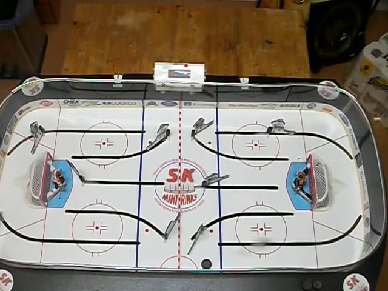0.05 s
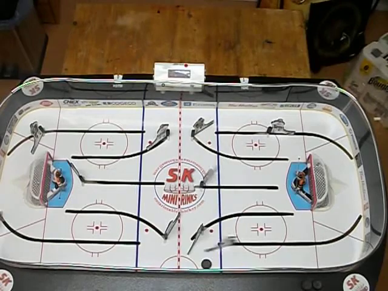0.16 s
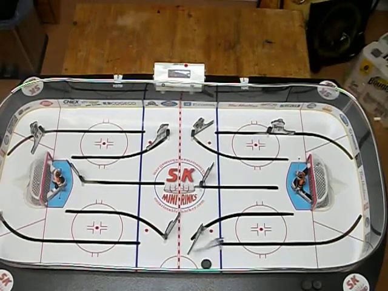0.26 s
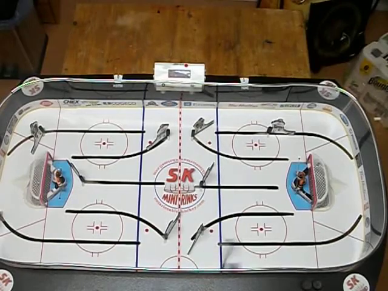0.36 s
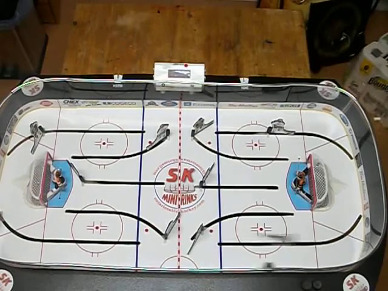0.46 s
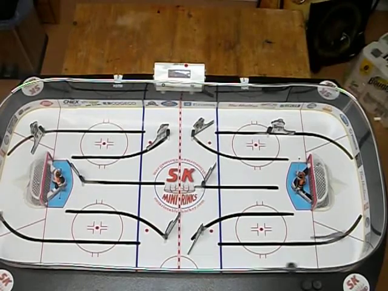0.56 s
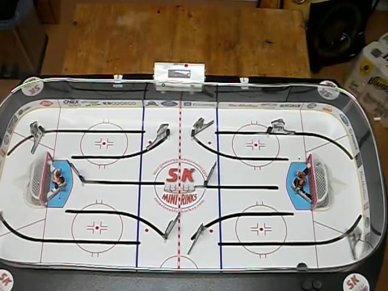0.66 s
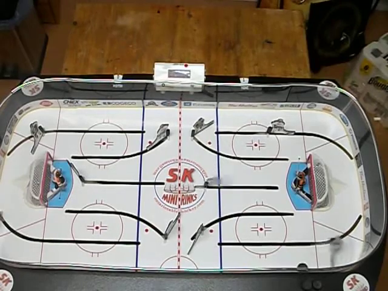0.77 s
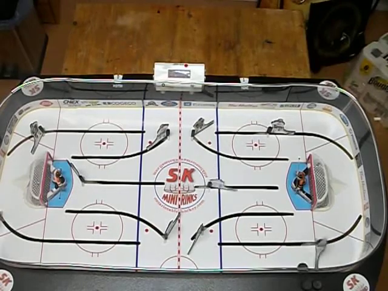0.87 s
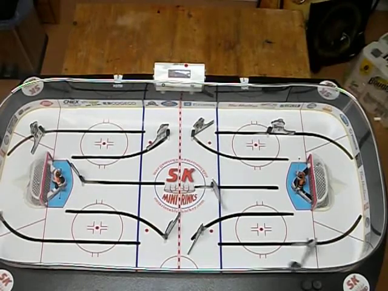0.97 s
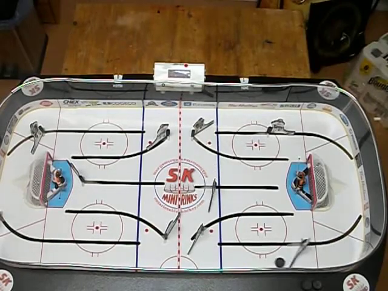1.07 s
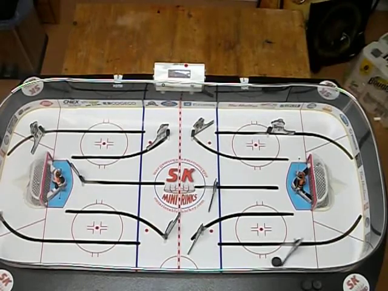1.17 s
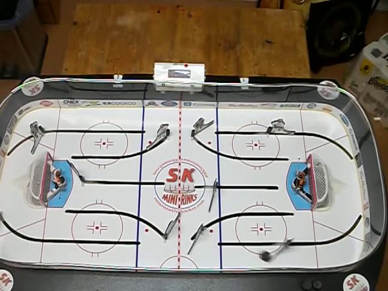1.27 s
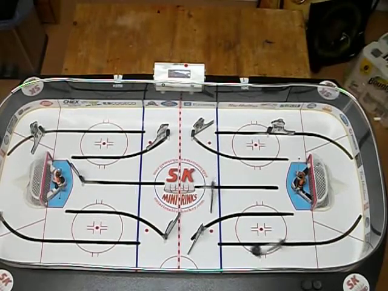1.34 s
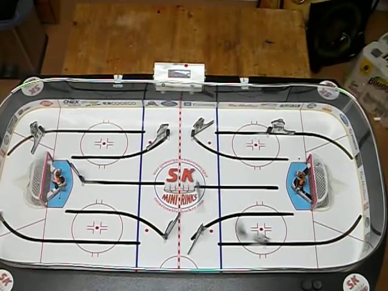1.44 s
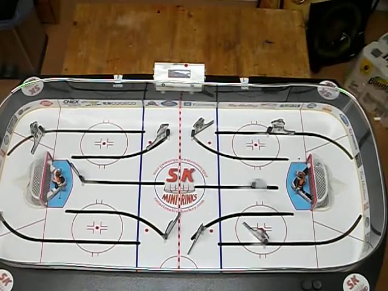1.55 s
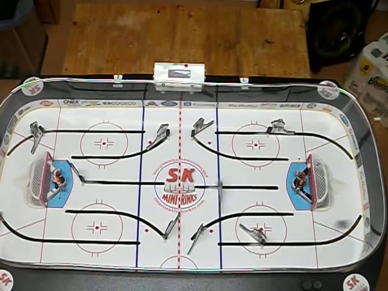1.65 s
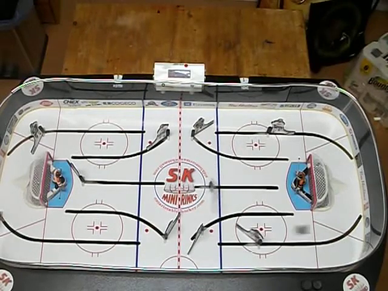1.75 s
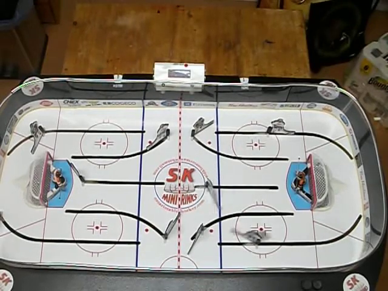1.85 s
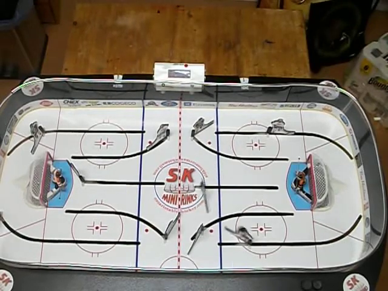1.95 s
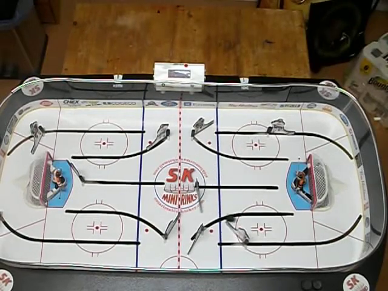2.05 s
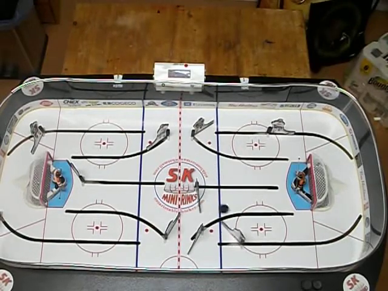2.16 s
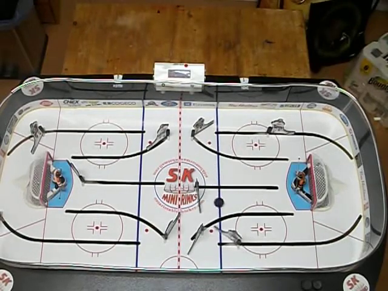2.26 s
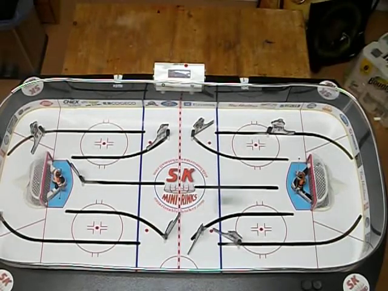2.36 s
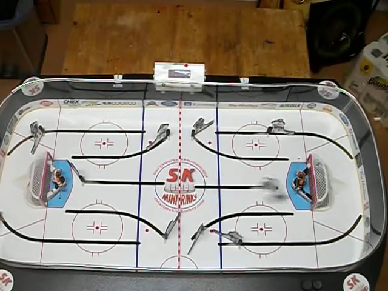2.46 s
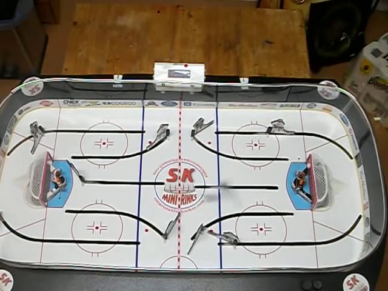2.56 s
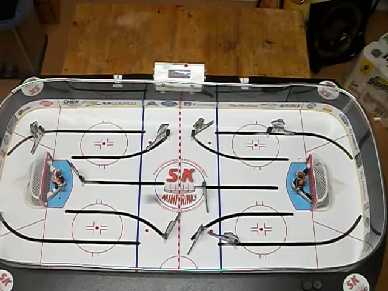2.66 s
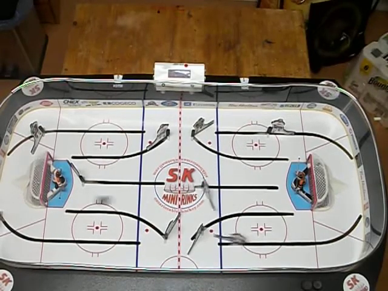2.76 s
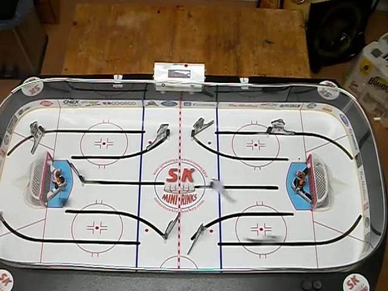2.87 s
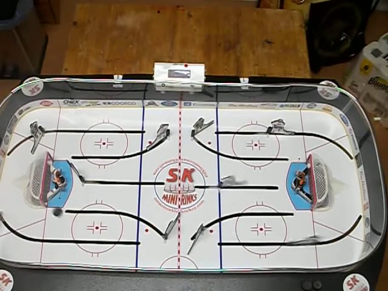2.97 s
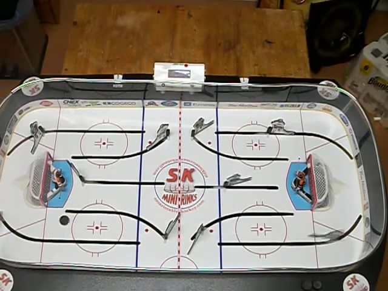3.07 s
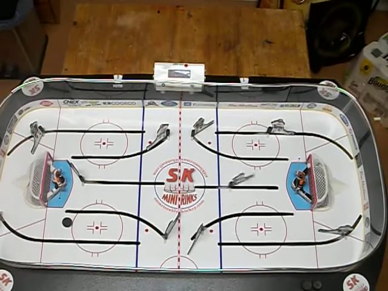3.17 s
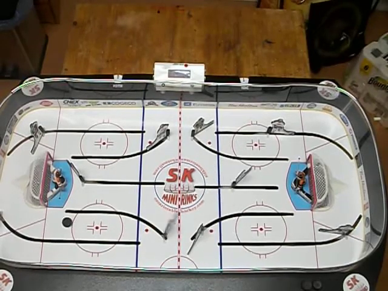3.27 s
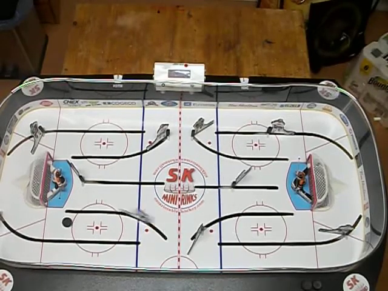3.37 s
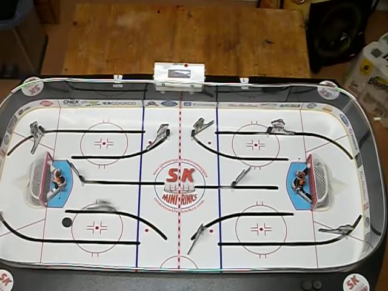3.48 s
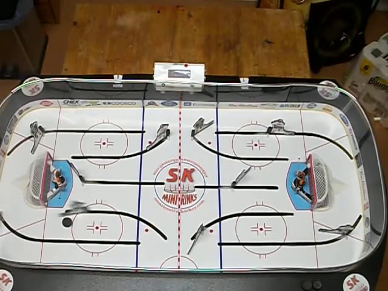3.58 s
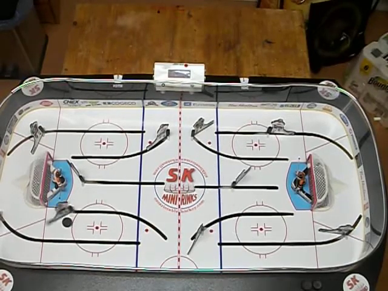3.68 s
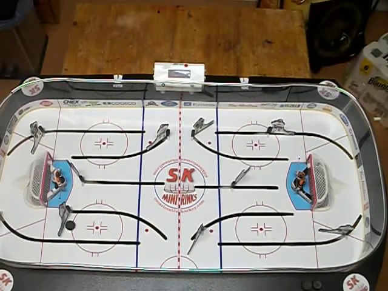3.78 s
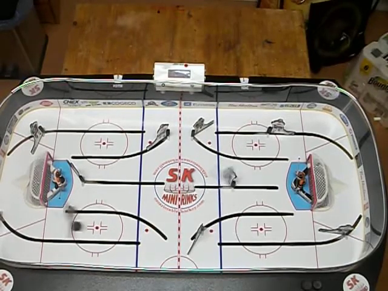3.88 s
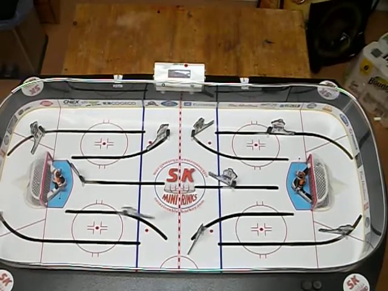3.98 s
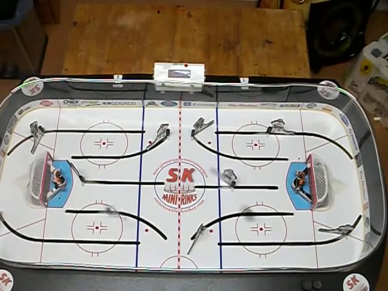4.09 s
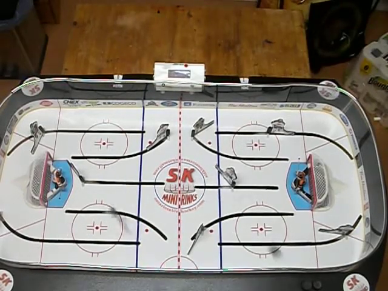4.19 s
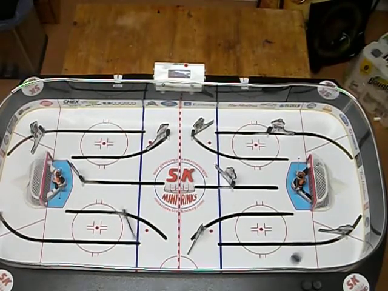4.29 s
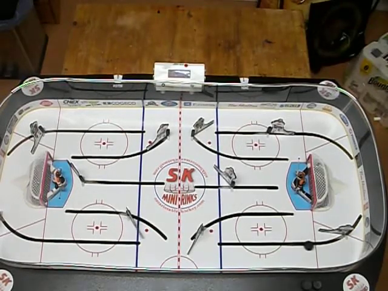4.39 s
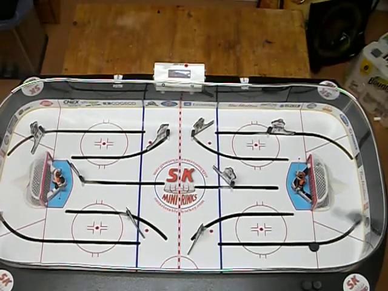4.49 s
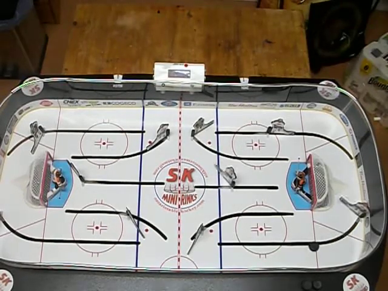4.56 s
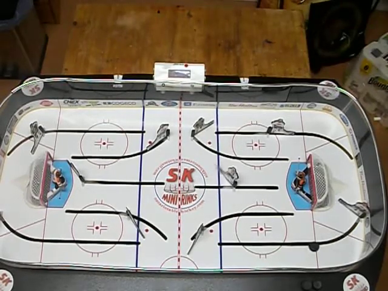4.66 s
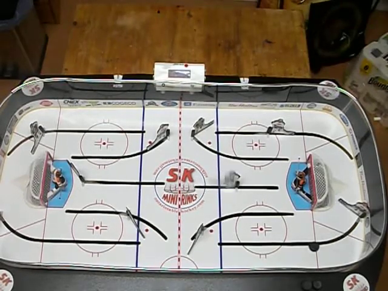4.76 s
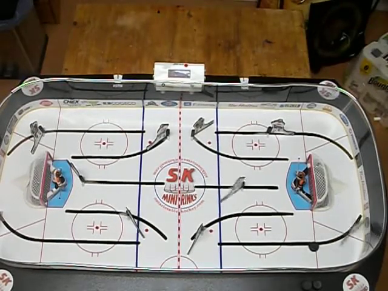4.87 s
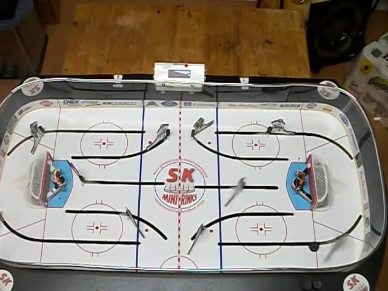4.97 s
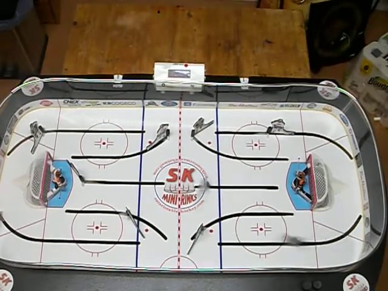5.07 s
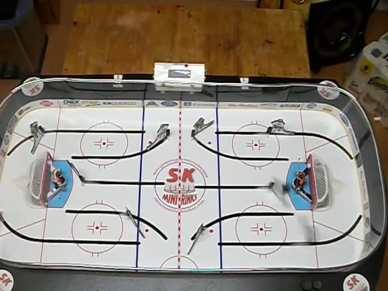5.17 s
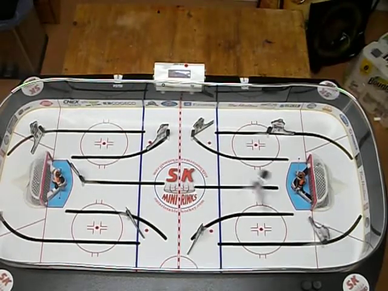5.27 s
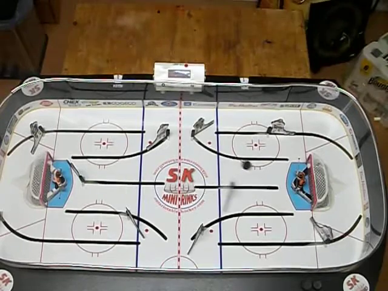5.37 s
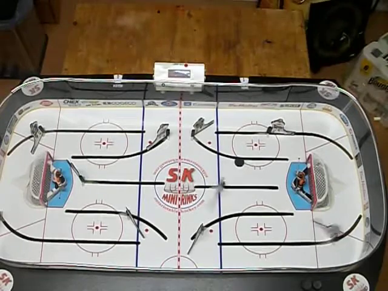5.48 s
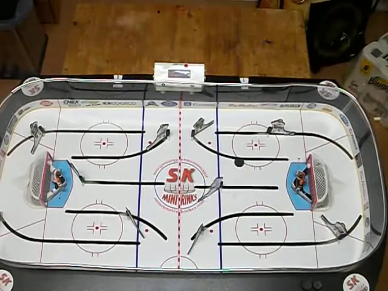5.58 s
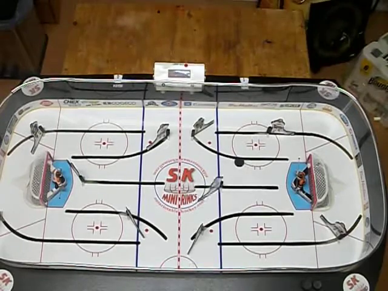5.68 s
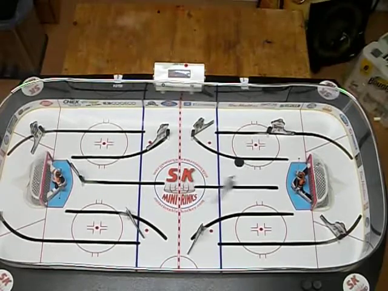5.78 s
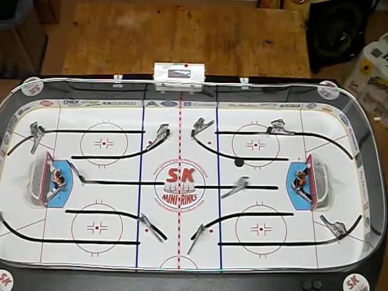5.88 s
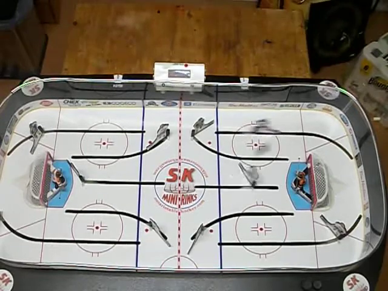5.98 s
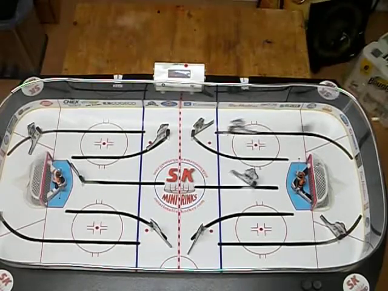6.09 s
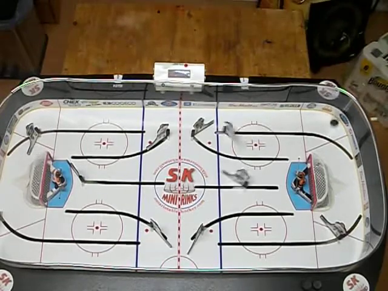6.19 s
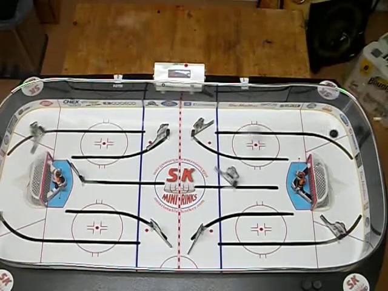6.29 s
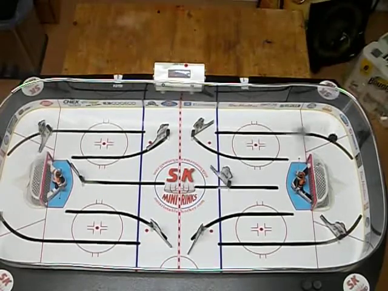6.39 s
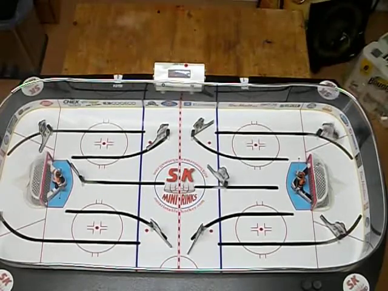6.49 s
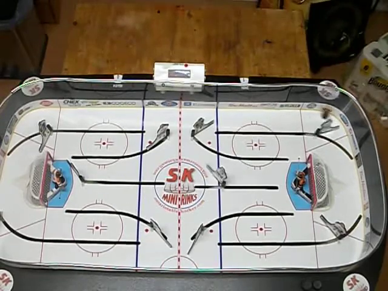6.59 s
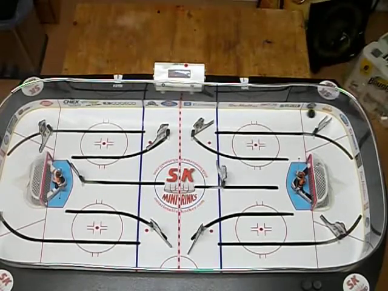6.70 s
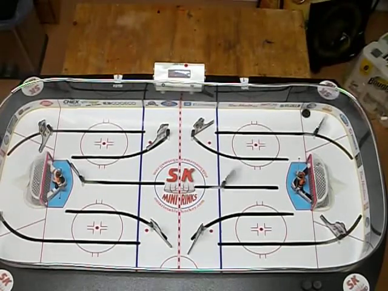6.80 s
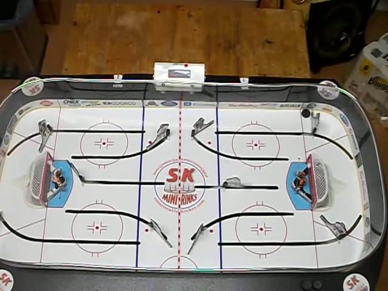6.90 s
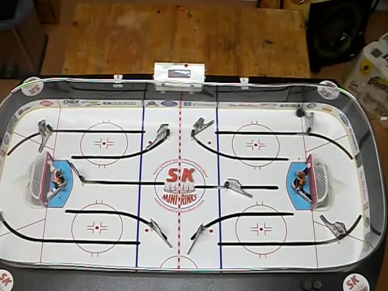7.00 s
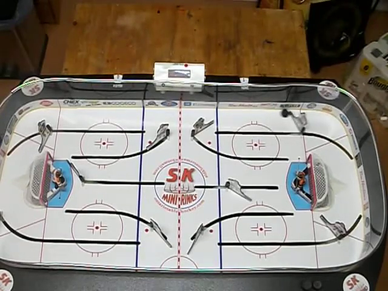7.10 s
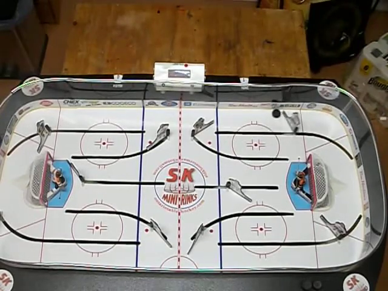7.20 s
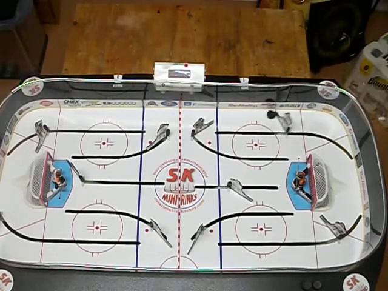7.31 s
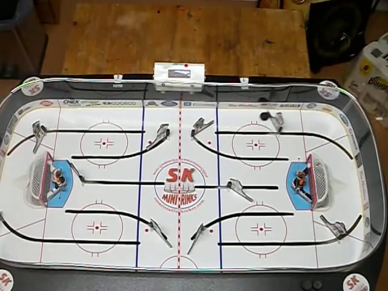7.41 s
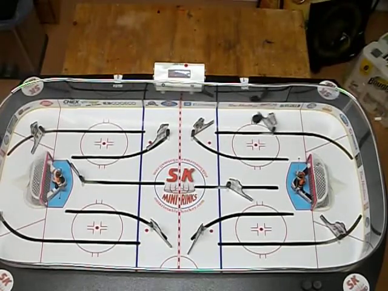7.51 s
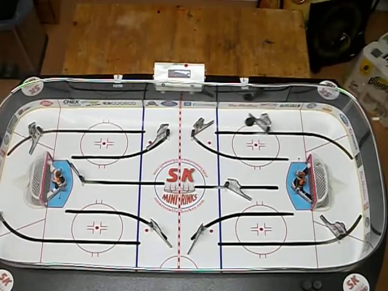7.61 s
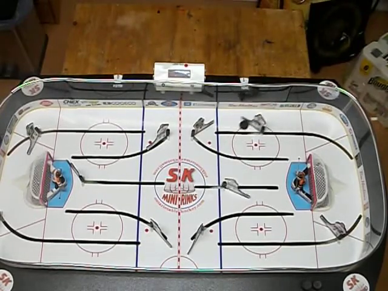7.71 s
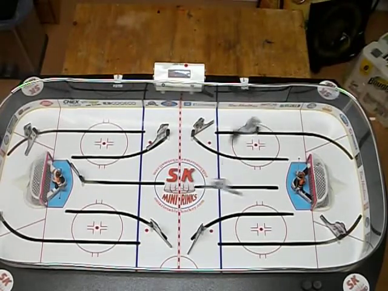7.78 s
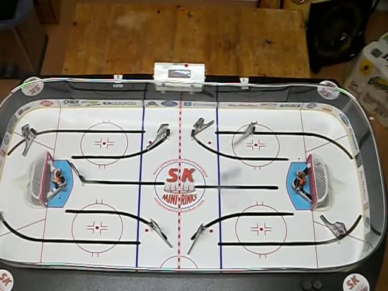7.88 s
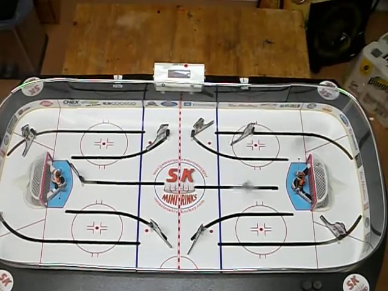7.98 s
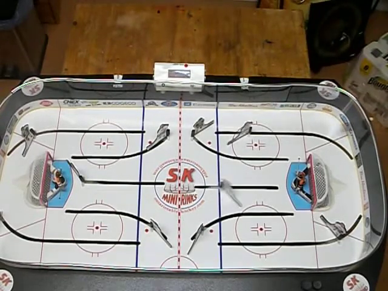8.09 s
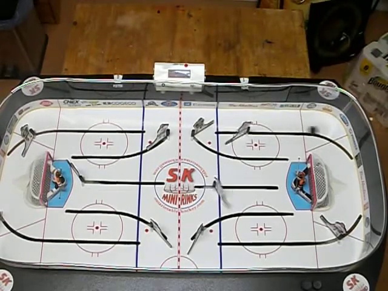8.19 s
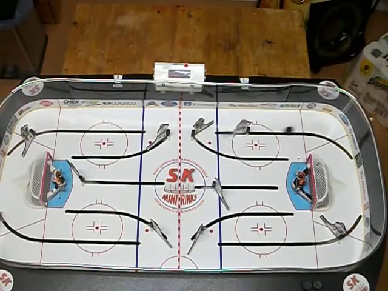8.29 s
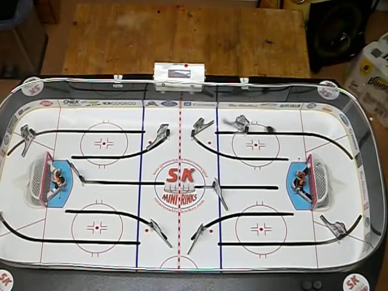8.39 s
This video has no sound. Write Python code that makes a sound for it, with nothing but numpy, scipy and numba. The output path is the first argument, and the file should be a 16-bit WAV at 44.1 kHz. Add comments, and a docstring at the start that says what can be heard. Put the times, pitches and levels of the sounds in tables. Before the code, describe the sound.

Rods scrape and chatter while a puck clacks sharply around a hollow plastic rink, in uneven flurries with short pauses, through a small camera microphone.

```python
"""A rod scrapes over faint hum and air, then clacks break in: rod hockey on a hollow plastic rink in a quiet room.
Puck, sticks and rod stops strike damped modes and bounce; sliding rods chatter noise through the same modes.
Drags sing in one band, as noise through two short rings in a row at one pitch; decaying noise gives the echoes.
A small camera cuts the top, turns itself down after loud play and clips the hardest blows."""
import sys
import numpy as np
from scipy import signal
from scipy.fft import rfft, irfft
from scipy.io import wavfile
from scipy.ndimage import uniform_filter1d
from numba import njit

SR = 44100
rng = np.random.default_rng(int(sys.argv[2]) if len(sys.argv) > 2 else 0)


def store_pcm(level_fs):
    """Save levels as 16-bit WAV."""
    pcm = np.round(np.clip(level_fs, -1, 1) * 32767).astype(np.int16)
    wavfile.write(sys.argv[1], SR, np.atleast_2d(pcm).T)


def rack_gain(trim_db):
    """Turn a fader trim in dB into the linear factor to multiply a signal by."""
    fader = np.asarray(trim_db, float)
    return 10 ** (fader / 20)


N = 372644

# modes of rink, players and puck: f/Hz, level/dB
RINK_MODES = [(330, -0.5), (470, 3.5), (630, 0), (750, -9.5), (950, -2), (1250, -0.5), (1500, 3.5),
              (2000, 3), (2400, 7), (2800, 5.5), (3200, 5.5), (3600, 6), (3920, 9), (4250, 7.5),
              (4550, 7.5), (4900, 8), (5300, -3), (5800, -9), (6400, 1)]
# rod pushes and pulls: t/s, length/s, treble chatter/dB, hollow rumble/dB
STROKES = [(0, 0.014, -36.5, -27), (0.097, 0.038, -43, -33), (0.509, 0.011, -32.5, -24),
           (0.61, 0.041, -28.5, -23), (0.737, 0.25, -49, -36), (1.388, 0.12, -48.5, -46),
           (1.529, 0.23, -33, -33.5), (1.892, 0.27, -46, -39), (2.434, 0.17, -37.5, -36.5),
           (2.974, 0.21, -48, -33), (3.411, 0.16, -45.5, -36.5), (3.506, 0.06, -36, -32.5),
           (3.85, 0.18, -64.5, -47), (4.009, 0.041, -30.5, -25), (4.264, 0.11, -25, -28.5),
           (4.46, 0.19, -35, -29), (4.998, 0.17, -46, -31), (5.119, 0.1, -28, -29),
           (5.253, 0.065, -24, -40.5), (5.325, 0.052, -33, -29), (5.585, 0.085, -48, -34),
           (5.858, 0.57, -46.5, -41.5), (6.268, 0.21, -39, -28.5), (6.557, 0.14, -44.5, -36.5),
           (7.857, 0.04, -53.5, -68), (7.88, 0.069, -37, -35), (7.968, 0.28, -28.5, -29),
           (8.238, 0.13, -27.5, -20)]
# room air spectrum, relative: f/Hz, level/dB
AIR_SPECTRUM = [(8.8, -45), (15, -4), (49, -16), (187, -14.5), (340, -14.5), (795, -22.5), (971, -20.5),
                (1770, -33.5), (3930, -25.5), (4920, -25), (5860, -27.5), (7620, -52), (12900, -120)]
# machine hum: f/Hz, rms level/dB
HUM_TONES = [(55.7, -51.5), (118, -55.5), (151, -56.5)]
# echo bands: f/Hz, t60/s, level/dB
ROOM_BANDS = [(300, 0.66, -15.5), (1296, 0.43, -7), (3800, 0.37, -2.5)]
# blows: t/s, peak level/dB, brightest ring f/Hz, hollow knock re bright rings/dB, level to walls/dB
CLACKS = [(0.0945, -10, 3390, -17.5, -0.5), (0.3372, -13, 3160, -4.5, 7), (0.381, 1, 4800, -53, -3.5),
          (0.407, 0, 3910, -50, -3), (0.5046, -1.5, 4400, -29.5, 2.5), (0.5232, -4, 4350, -42, -13),
          (0.53, 1, 3550, -23.5, -24), (0.5986, -3, 4380, -14, 9.5), (0.603, -11, 4620, -27, -6),
          (0.6242, -5, 4400, -39, -12), (0.63, -3, 4530, -29, -16), (0.643, -9.5, 4300, -22, -11),
          (0.6585, -1.5, 4170, -21, -15), (0.7607, -9, 3920, -25, 3), (0.818, -11.5, 3530, -7.5, 9),
          (1.011, -6.5, 4700, -15.5, -2), (1.0315, -14.5, 4630, -35, -0.5),
          (1.262, -19.5, 4600, -30.5, 2.5), (1.519, -9.5, 3980, -14, 5.5), (1.5536, -2, 3650, -29.5, -11.5),
          (1.5698, 12, 4150, -46.5, -7), (1.5788, 1.5, 3870, -49, -14), (1.5845, 5.5, 4350, -55.5, -18),
          (1.596, 10.5, 4770, -45.5, -2), (1.642, 4.5, 4070, -47, -18), (1.664, -13.5, 4400, -20, -9),
          (1.697, 18.5, 4480, -44, -6.5), (1.8916, 11, 5050, -32, -4), (1.904, 2.5, 4200, -56, -21),
          (1.964, -3.5, 3600, -17.5, -2), (2.006, 8.5, 4030, -30, 0.5), (2.051, -7, 4250, -22.5, -15.5),
          (2.0755, -6, 3100, -20.5, 0.5), (2.1806, -9.5, 4280, -32, -24), (2.2123, 6.5, 4120, -54.5, 0.5),
          (2.239, -4, 3440, -47, -6.5), (2.314, -9, 4150, -30, -2), (2.3933, -5.5, 4250, -37.5, 2),
          (2.4274, -4.5, 3430, -43.5, 0), (2.4332, 3, 5400, -28.5, 4.5), (2.4512, 1.5, 4130, -36.5, 1.5),
          (2.474, 4, 3930, -49, -21), (2.488, 6, 3960, -28, -11.5), (2.5085, 6.5, 4050, -46.5, 8.5),
          (2.5563, -0.5, 3400, -25.5, -11), (2.579, 13, 4230, -51, -13.5), (2.626, 6, 4520, -48, -12),
          (2.628, -1, 4200, -33, 3.5), (3.0048, -1, 3090, -45, -0.5), (3.1166, -10, 4230, -34, 1),
          (3.154, -17, 4230, -37, -2), (3.2195, -18, 3900, -25, 1), (3.4493, -19, 3140, -13, -15),
          (3.5057, -8.5, 3610, -24, 0), (3.5438, -10, 3600, -16, 10.5), (3.553, -21.5, 3750, -3, -1.5),
          (3.6387, -14, 3170, -6.5, 12), (3.8166, -8.5, 3900, -26.5, 2), (3.9077, -11, 3400, -28.5, 4.5),
          (3.952, -8, 3900, -24, 8.5), (4.003, -8.5, 4110, -46, 14), (4.022, -4, 3340, -15, -4),
          (4.029, -0.5, 3820, -30, -18.5), (4.041, 0, 3730, -28.5, -4.5), (4.122, 19.5, 3770, -68, -8.5),
          (4.2514, 21.5, 3750, -40, -18), (4.2642, 3, 3310, -46, -22), (4.306, 11.5, 3840, -43.5, -8),
          (4.324, 5, 4100, -46, -17), (4.3393, 6.5, 4130, -32, -12.5), (4.463, 8, 3660, -21, -5.5),
          (4.477, -3.5, 3050, -27, -21), (4.528, 0, 4470, -14.5, 10), (4.6468, -3.5, 1890, -26, -9.5),
          (4.656, -1.5, 1990, -17, 3), (5.0017, -12, 3360, -13.5, 3), (5.094, -14, 3230, -29.5, -2.5),
          (5.1131, 2.5, 3700, -22, -4.5), (5.1212, -4.5, 3910, -34, -4.5), (5.157, 4.5, 4260, -33, -1.5),
          (5.2225, 0.5, 3540, -38, 3.5), (5.235, 3, 3830, -16, -1), (5.2392, 13, 5030, -42, -2),
          (5.2573, 8.5, 4020, -25.5, -4), (5.263, 0, 4770, -41, -15), (5.306, 2, 4300, -34, -5),
          (5.316, -5.5, 3500, -43, -4.5), (5.332, 1, 3800, -43, 0.5), (5.3428, -11, 4240, -27, -25),
          (5.362, 1.5, 4200, -29.5, 1.5), (5.4634, -5.5, 4940, -38, -28), (5.6683, -20.5, 3300, -23, 9),
          (5.8234, -18.5, 3450, -12.5, 13), (5.847, -10.5, 3060, -19.5, 4.5), (6.0169, -2, 3600, -17, 4.5),
          (6.037, 17, 4100, -24.5, -7), (6.052, 3, 3830, -30.5, -4), (6.145, -4, 3630, -9, 3.5),
          (6.177, -3, 2240, -20, -1), (6.1936, -4, 4100, -19, -2), (6.211, -4, 3930, -32, -20.5),
          (6.266, 14.5, 3740, -42, -4), (6.2947, -2.5, 3820, -42, -24.5), (6.339, -6.5, 3500, -23, 6),
          (6.38, -1, 3720, -37, -17), (6.408, -6.5, 3700, -24, 3), (6.4399, 2, 4080, -23, -18.5),
          (6.5706, 3, 3660, -37.5, -4.5), (6.636, 5, 3700, -23.5, -7.5), (6.6756, -10.5, 3400, -11, -5),
          (7.013, -11, 3600, -31, 1.5), (7.3332, -15, 4180, -18, -4), (7.9095, -13, 3500, -24, -23),
          (7.9165, 4, 3560, -61, -1.5), (7.9206, -2.5, 3670, -40, -7.5), (7.9413, -9, 3700, -34, -21),
          (7.95, -11.5, 3300, -35, -20.5), (7.969, 15, 3670, -46.5, -14), (7.9755, 11.5, 3950, -30.5, -0.5),
          (7.981, -1, 3080, -25.5, -25.5), (7.9892, 2.5, 4120, -36.5, -2.5), (8.0068, -4.5, 4500, -32, -9),
          (8.0413, 6, 4550, -49, -5.5), (8.154, 7, 4120, -26.5, 4), (8.164, 17, 3770, -19, -8.5),
          (8.2385, 32.5, 3900, -26, -11.5), (8.278, 8, 3660, -35, -22), (8.3292, 8, 2200, -12, -5),
          (8.343, 1, 3890, -5, -4), (8.3777, 1.5, 3700, -28, -26)]
# singing drags of a player or the puck: t/s, fade t60/s, f/Hz, level/dB
DRAGS = [(0.504, 0.16, 1400, -15.5), (1.705, 0.46, 2010, -15), (2.178, .25, 1190, -27),
         (2.47, 0.13, 1504, -19), (4.462, 0.16, 1510, -14), (7.994, 0.62, 1390, -22)]

HOLLOW_HZ, HARD_HZ = 1100, 2900  # modes below: hollow body; above: hard surfaces
RING_CYCLES = 24  # swings to -60 dB
START_DB_S, STOP_DB_S, IDLE_DB = 399, 227, -57.5  # stroke swell and decay; fidgeting hands between strokes
RUB_S = 0.002  # one chatter knock
AIR_DB = -41.5
SPOTS, BOUNCES = 4, 10  # echo patterns for blows; bounces per blow
BOUNCE_S, BOUNCE_DB, BOUNCE_SPREAD_DB = 0.0011, -7, 3  # basic spacing before random delay, change each, scatter
CONTACT_S, SOFTER = 0.0004, 0.3  # contact of a 0 dB blow; dB longer per dB weaker
EVENED, WALL_RING_S = 0.4, 0.008  # share of blow colour lost towards the walls; t60 of the ring they hear
BASS_HZ, TOP_HZ, SKIRT_HZ = 293, 5020, 6700
RISE_DB_S, FALL_DB_S, LAG_S = 47.5, 2204.5, 0.07  # gain recovery; gain loss at unit power; power lag
LEAN, LEAN_MOST, LEAN_S = 0.92, 0.67, 0.00017  # share of overload shifting zero; overload cap; smoothing


def unit(x):
    """Scale to rms 1."""
    return x / np.sqrt(np.mean(x ** 2))


def colour(x, points):
    """Shape the spectrum by (f/Hz, level/dB) points, linear in log f."""
    hz, db = np.transpose(points)
    f = np.arange(len(x) // 2 + 1) * SR / len(x) + 1
    return irfft(rfft(x) * rack_gain(np.interp(np.log(f), np.log(hz), db)), len(x))


def ring(x, hz, t60_s):
    """One damped mode driven by x: a two-pole resonator."""
    r = np.exp(-np.log(1000) / (t60_s * SR))
    return signal.lfilter([1, 0, -1], [1, -2 * r * np.cos(2 * np.pi * hz / SR), r * r], x)


def hollowness(hz):
    """How far a mode belongs to the hollow body (1) or to the hard surfaces (0)."""
    return np.interp(np.log(hz), np.log([HOLLOW_HZ, HARD_HZ]), [1, 0])


def strokes():
    """Each stroke swells, holds and dies away; returns chatter and rumble levels in dB."""
    t = np.arange(0, N, 64) / SR
    power = np.full((2, len(t)), rack_gain(2 * IDLE_DB))
    for start_s, length_s, *levels_db in STROKES:
        swell_db = START_DB_S * (t - start_s)
        decay_db = STOP_DB_S * (start_s + length_s - t)
        shape_db = np.minimum(0, np.minimum(swell_db, decay_db))
        power = power + rack_gain(2 * np.add.outer(levels_db, shape_db))
    return [np.interp(np.arange(N) / SR, t, 10 * np.log10(p)) for p in power]


def slide(per_s=260.0, spread_db=4.0, smooth_db=-13.0, grip_db=3.0, mellow_db=10.5, most=1.7, longest_s=0.017):
    """Loose rods chatter in tiny uneven knocks over a scrape that is smoother in the hollow modes."""
    chatter_db, rumble_db = strokes()
    knocks = (rng.random(N) < per_s / SR) * rack_gain(spread_db * np.minimum(rng.exponential(1, N), most))
    # each knock is a short rub that swells and dies
    rubs = np.convolve(knocks, np.hanning(int(RUB_S * SR)), "same")
    out = 0
    for hz, db in RINK_MODES:
        hollow = hollowness(hz)
        chatter = unit(rubs * rng.standard_normal(N))
        scrape = rack_gain(smooth_db + mellow_db * hollow) * rng.standard_normal(N)
        level_db = chatter_db + (rumble_db - chatter_db) * hollow
        mode = unit(ring(chatter + scrape, hz, min(RING_CYCLES / hz, longest_s)))
        out = out + rack_gain(db + level_db) * mode
    # the rod catches and lets go in its slot
    grip = uniform_filter1d(np.repeat(rng.standard_normal(N // 900 + 1), 900), 300)[:N]
    return out * rack_gain(grip_db * grip) / np.sqrt(len(RINK_MODES) / 2)


def room(x, first_s=0.0011):
    """Dense echoes, as noise bands that swell at once and die sooner in the treble."""
    t = np.arange(SR // 2) / SR
    tail = 0
    for hz, t60_s, db in ROOM_BANDS:
        shape = [(hz / 4, -30), (hz / 2, -3), (hz, 0), (hz * 2, -3), (hz * 4, -30)]
        band = colour(rng.standard_normal(len(t)), shape)
        band = band * rack_gain(-60 * t / t60_s) * (1 - np.exp(-(t / first_s) ** 2))
        tail = tail + rack_gain(db) * band / np.sqrt(np.sum(band ** 2))
    return signal.fftconvolve(x, tail)[:N]


def air():
    """Quiet room air as coloured noise, and a machine hum of steady sines."""
    t = np.arange(N) / SR
    hum = sum(rack_gain(db) * np.sqrt(2) * np.sin(2 * np.pi * hz * t) for hz, db in HUM_TONES)
    return rack_gain(AIR_DB) * unit(colour(rng.standard_normal(N), AIR_SPECTRUM)) + hum


def clacks(spot_db=3.5, focus_db=16.0, focus_oct=0.48, detune=0.038, longest_s=0.034):
    """Each blow on another spot mixes the modes anew and bounces; returns direct sound and sound to the walls."""
    direct, spread = np.zeros(N + 4096), np.zeros((SPOTS, N + 4096))
    hz, db = np.transpose(RINK_MODES)
    hollow = hollowness(hz)
    t = np.arange(2048) / SR
    chance = rng.standard_normal((len(CLACKS), 3, len(hz)))
    for n, (clack, (spot, tune, late)) in enumerate(zip(CLACKS, chance)):
        start_s, peak_db, bright_hz, knock_db, wall_db = clack
        focus = focus_db * (np.exp(-(np.log2(hz / bright_hz) / focus_oct) ** 2) - 1)
        gain = rack_gain(db + focus + (knock_db - focus) * hollow)
        # modes die within equal swings, the low ones within longest_s
        swings = np.outer(hz * (1 + detune * tune), t)
        modes = np.sin(2 * np.pi * swings) * rack_gain(-60 * np.maximum(swings / RING_CYCLES, t / longest_s))
        # the push builds up while the parts touch
        modes = modes * (1 - np.exp(-(t / CONTACT_S * rack_gain(SOFTER * peak_db)) ** 2))
        blow = np.zeros(2048)
        blow[0] = 1
        for k in range(BOUNCES):
            i = min(int(BOUNCE_S * SR * (k + 1 + np.abs(late[k]) / 2)), 2047)
            bounce_db = min(BOUNCE_DB * (k + 1) + BOUNCE_SPREAD_DB * spot[k], 0)
            blow[i] = np.sign(late[k]) * rack_gain(bounce_db)
        near = np.convolve(blow, gain * rack_gain(spot_db * spot) @ modes)
        size, start = rack_gain(peak_db) / np.max(np.abs(near)), int(start_s * SR)
        direct[start:start + len(near)] += size * near
        # the walls hear all directions at once, which evens out the mix of modes
        wall_gain = gain * rack_gain(-EVENED * focus * (1.5 - hollow))
        wall = wall_gain @ modes * rack_gain(-60 * t / WALL_RING_S)
        spread[n % SPOTS, start:start + len(t)] += rack_gain(wall_db) * size * np.linalg.norm(blow) * wall
    return direct[:N], spread[:, :N]


def drags(grain_s=0.005, catch_db=1.5):
    """Rough friction, as noise through two short rings in a row at one pitch, fades as the part slows down."""
    t, out = np.arange(N) / SR, 0
    for start_s, t60_s, hz, db in DRAGS:
        catch = np.repeat(rng.standard_normal(N // 200 + 1), 200)[:N]
        rub = rng.standard_normal(N) * rack_gain(catch_db * catch)
        fade = np.clip((t - start_s) / 0.0027, 0, 1) * rack_gain(-60 * np.maximum(t - start_s, 0) / t60_s)
        out = out + rack_gain(db) * fade * unit(ring(ring(rub, hz, grain_s), hz, grain_s / 2))
    return out


def scene():
    """The game, its echoes and the room; blows take turns among four echo patterns, the rods have their own."""
    direct, spread = clacks()
    rods = slide()
    echoes = sum(room(part) for part in [*spread, rack_gain(-2.5) * rods])
    game = direct + rods + drags() + echoes
    # the light rink sends out little bass
    game = signal.sosfilt(signal.butter(2, BASS_HZ, "high", fs=SR, output="sos"), game)
    return (game + air())[None]


@njit
def automatic_gain(x, rise, fall, lag, ceiling):
    """Gain in dB sinks with the lagging output power and climbs back at a steady rate, to 0 dB at most."""
    y, db, power = np.empty(len(x)), 0., 0.
    for i in range(len(x)):
        y[i] = x[i] * 10 ** (db / 20)
        power += (min(y[i] ** 2, ceiling ** 2) - power) * lag
        db = min(db + rise - fall * power, 0.)
    return y


def lean(x, ceiling):
    """An overdriven input leans to one side, which thumps and clips unevenly."""
    overload = np.clip(np.abs(x) - ceiling, 0, LEAN_MOST)
    return x + LEAN * uniform_filter1d(overload, max(int(LEAN_S * SR), 1))


def low_pass(x):
    """Removes everything above the highest recorded frequency."""
    return signal.sosfilt(signal.butter(12, 6700, fs=SR, output="sos"), x)


def record(dry):
    """Narrow camera sound: steep top, automatic gain that ducks after loud play, hard clipping."""
    ceiling = 1.0
    x = signal.sosfilt(signal.butter(10, TOP_HZ, fs=SR, output="sos"), dry[0])
    x = signal.sosfilt(signal.ellip(8, 0.5, 80, SKIRT_HZ, fs=SR, output="sos"), x)
    x = automatic_gain(x, RISE_DB_S / SR, FALL_DB_S / SR, 1 / (LAG_S * SR), ceiling)
    x = lean(x, ceiling)
    mix = np.clip(x, -ceiling, ceiling)[None]
    return low_pass(mix)


dry = scene()
out = record(dry)
store_pcm(out)
```